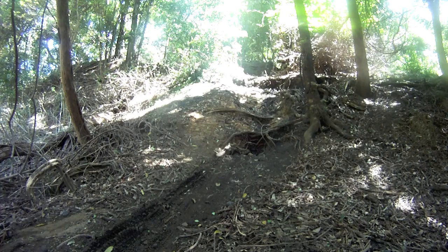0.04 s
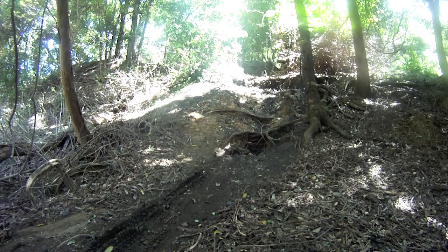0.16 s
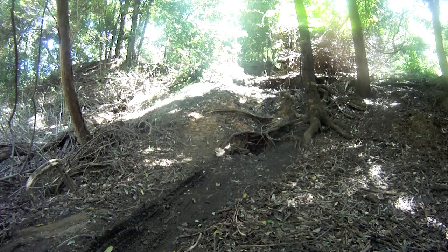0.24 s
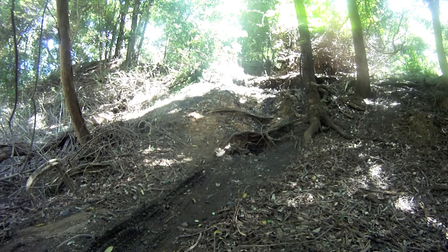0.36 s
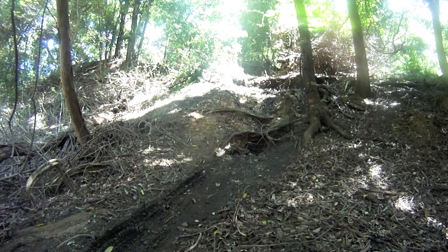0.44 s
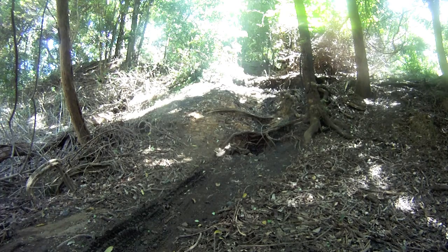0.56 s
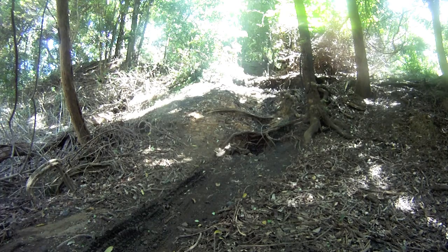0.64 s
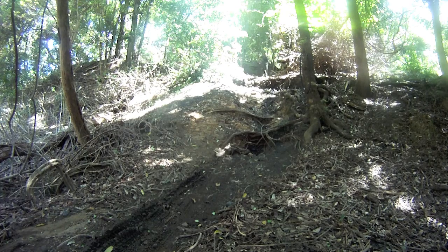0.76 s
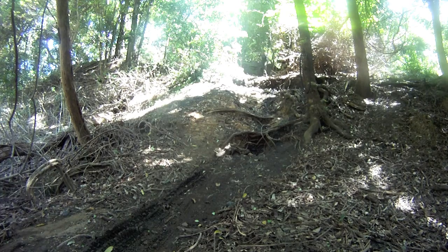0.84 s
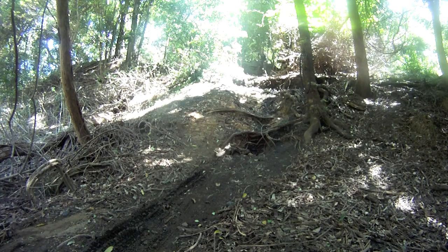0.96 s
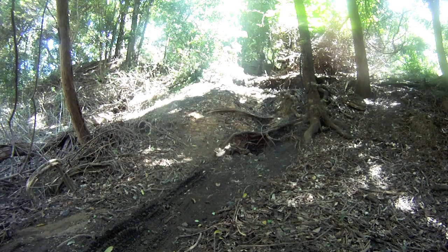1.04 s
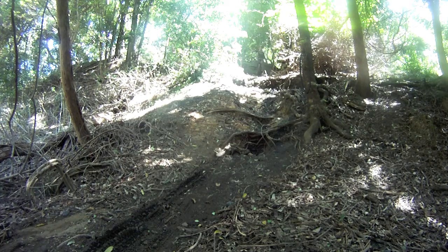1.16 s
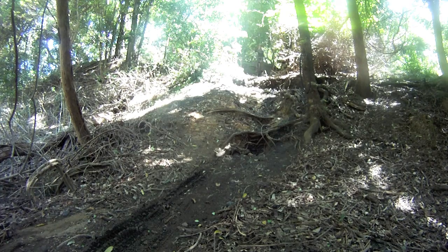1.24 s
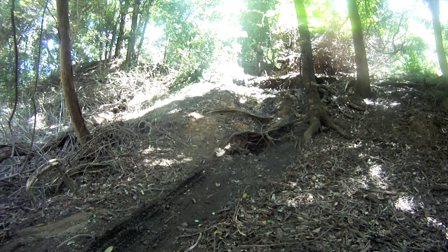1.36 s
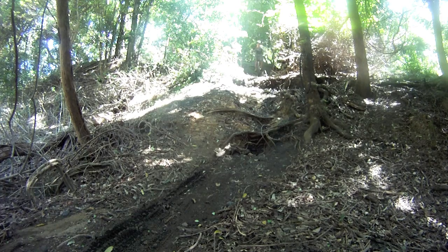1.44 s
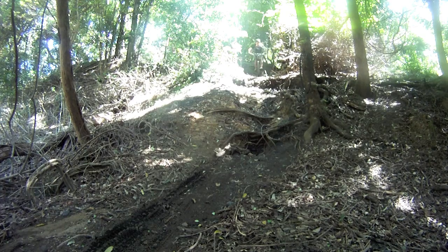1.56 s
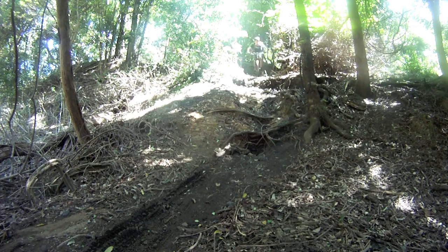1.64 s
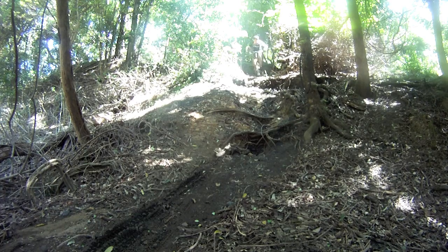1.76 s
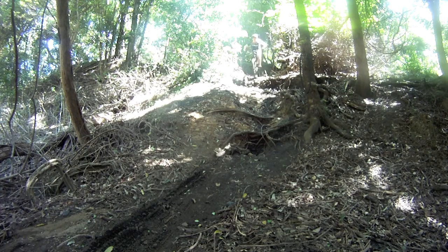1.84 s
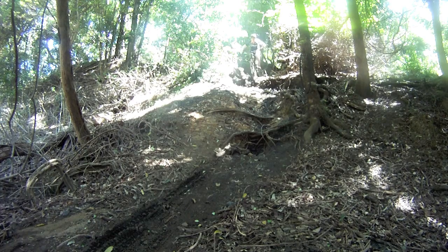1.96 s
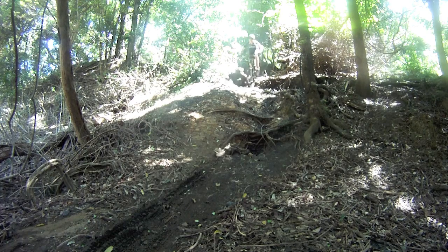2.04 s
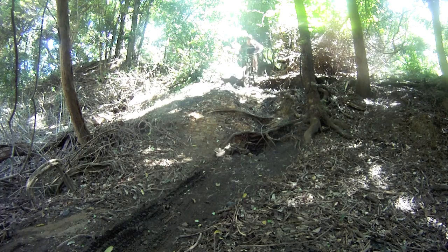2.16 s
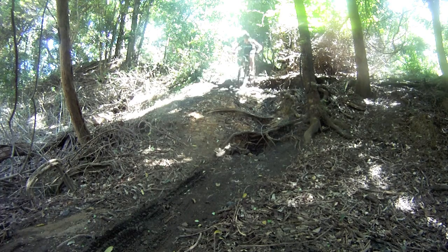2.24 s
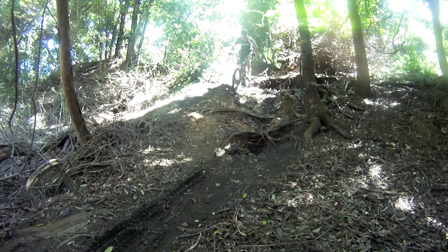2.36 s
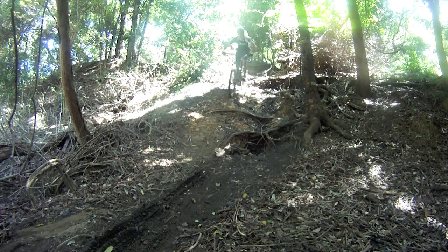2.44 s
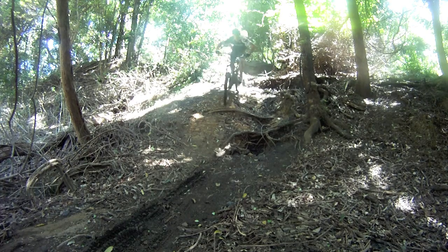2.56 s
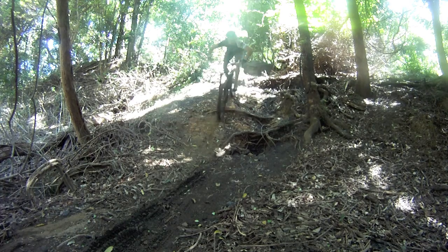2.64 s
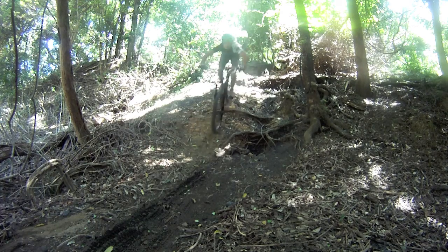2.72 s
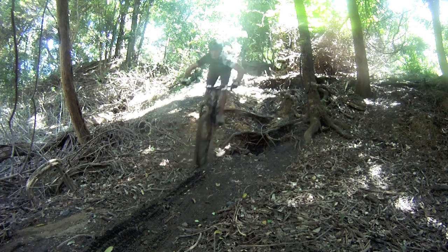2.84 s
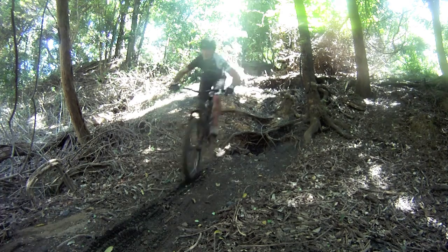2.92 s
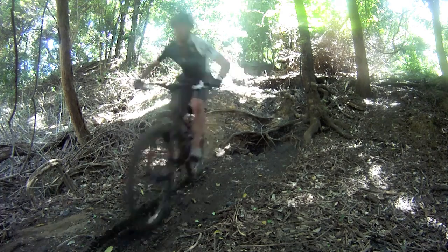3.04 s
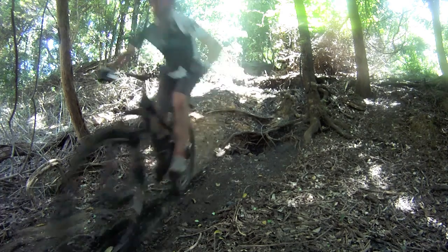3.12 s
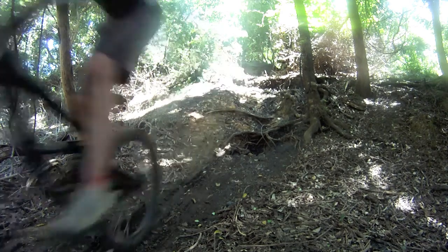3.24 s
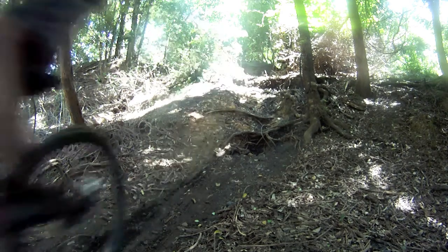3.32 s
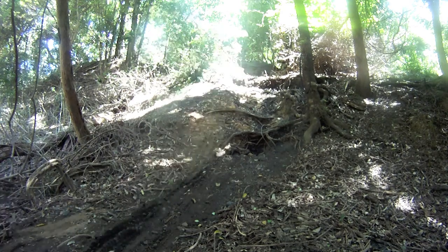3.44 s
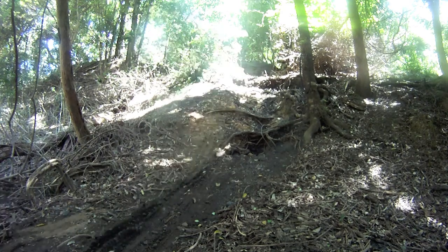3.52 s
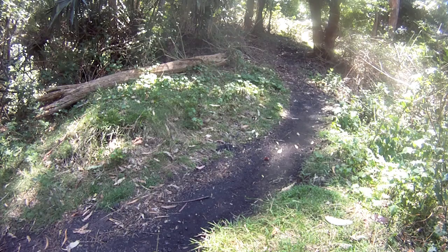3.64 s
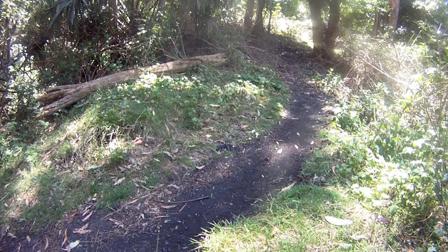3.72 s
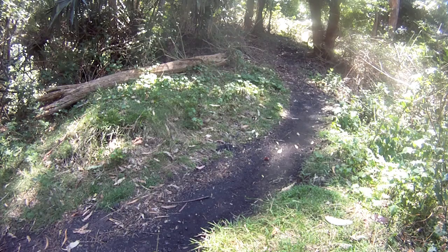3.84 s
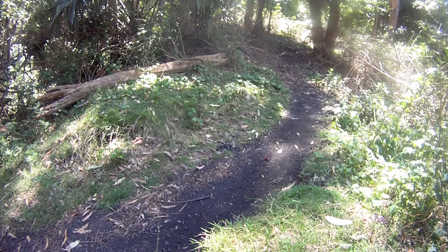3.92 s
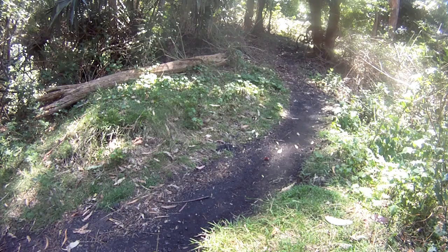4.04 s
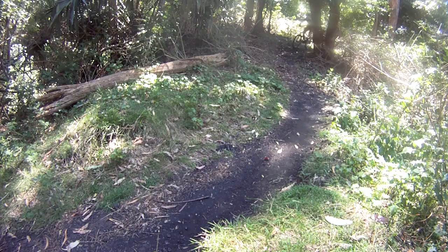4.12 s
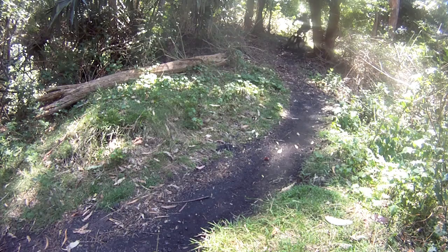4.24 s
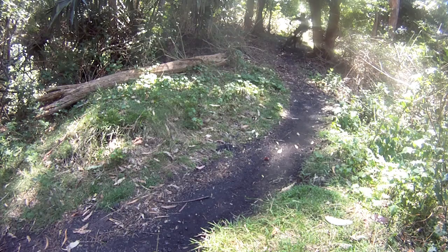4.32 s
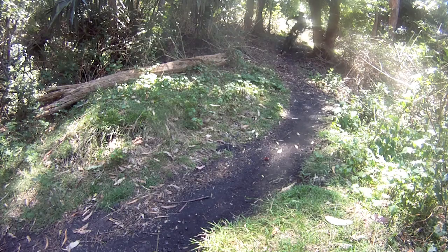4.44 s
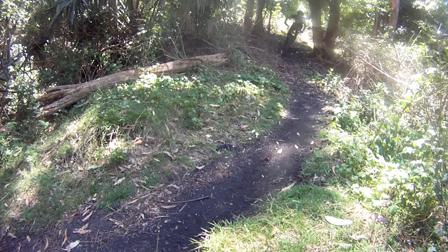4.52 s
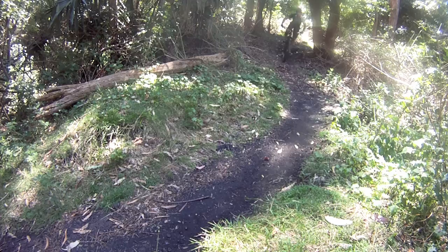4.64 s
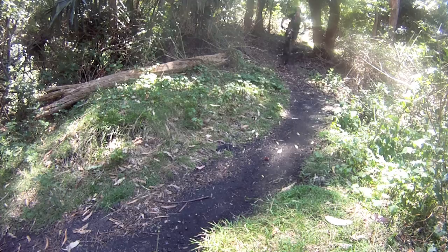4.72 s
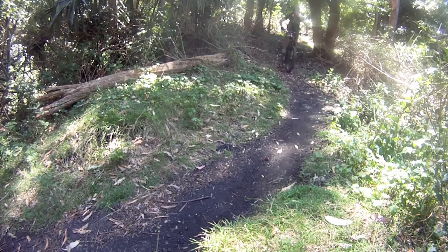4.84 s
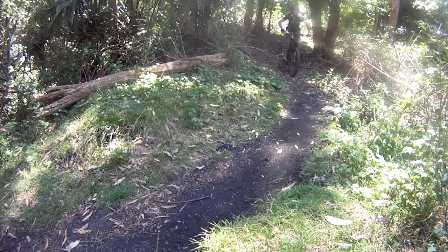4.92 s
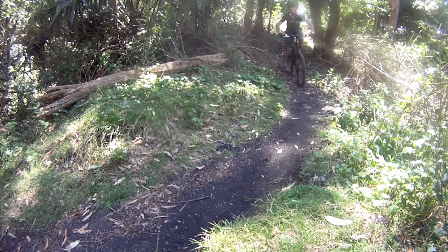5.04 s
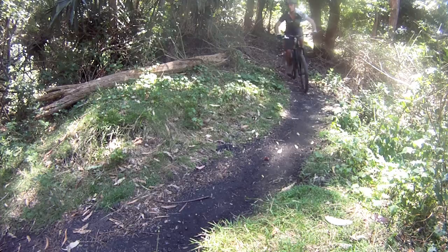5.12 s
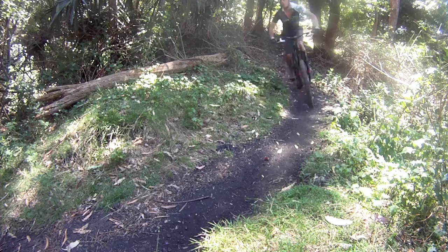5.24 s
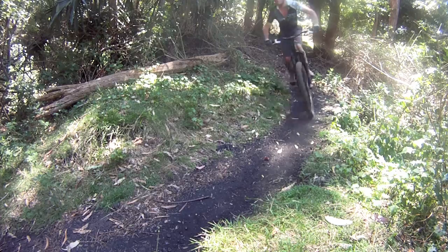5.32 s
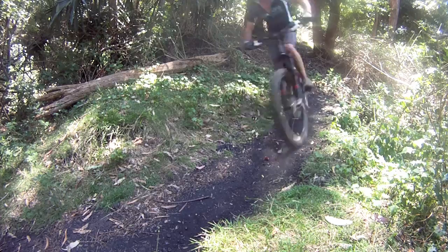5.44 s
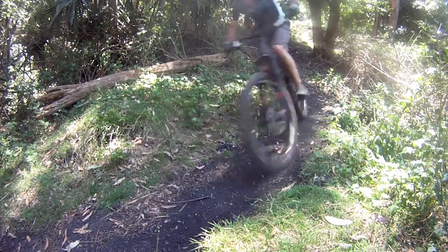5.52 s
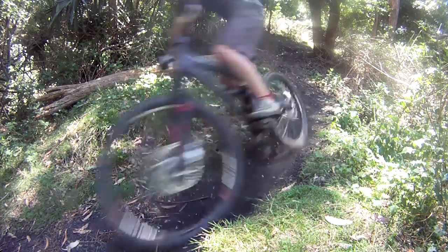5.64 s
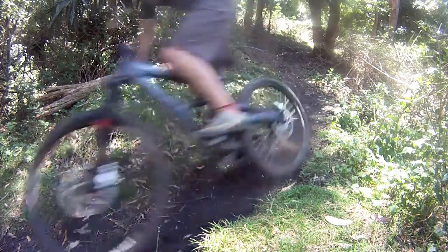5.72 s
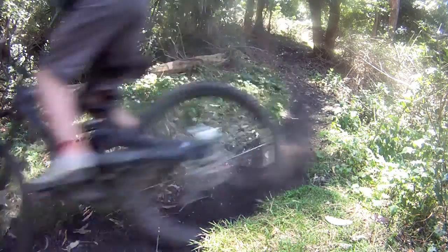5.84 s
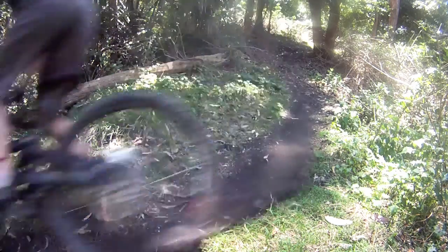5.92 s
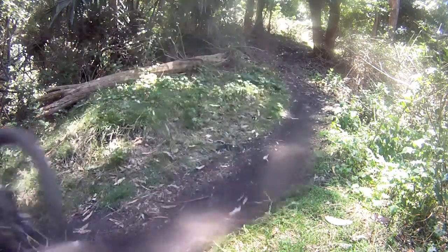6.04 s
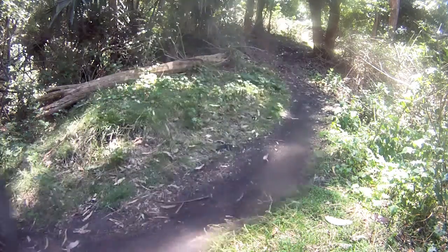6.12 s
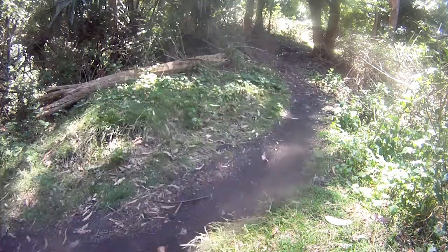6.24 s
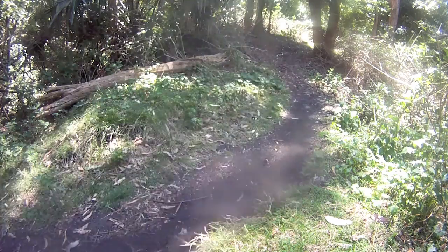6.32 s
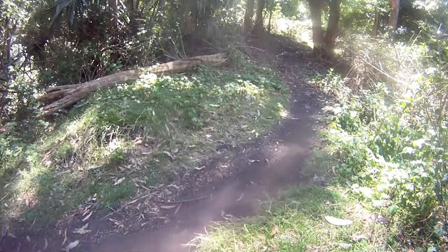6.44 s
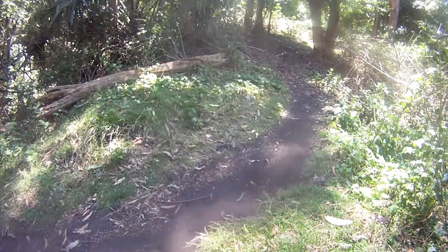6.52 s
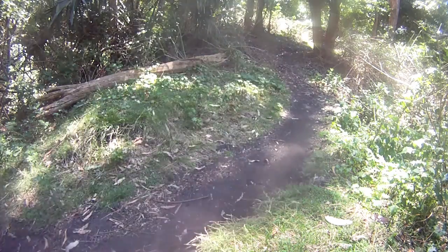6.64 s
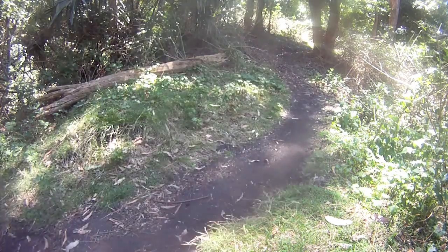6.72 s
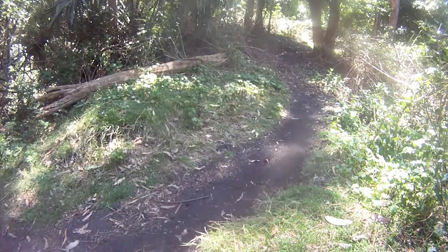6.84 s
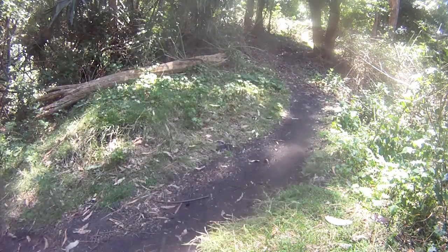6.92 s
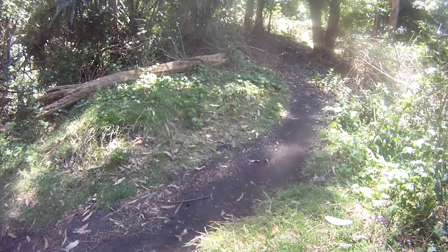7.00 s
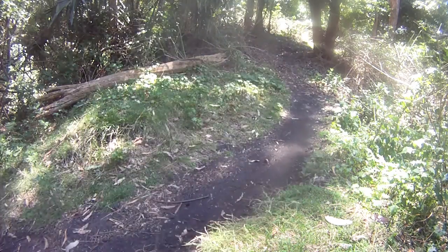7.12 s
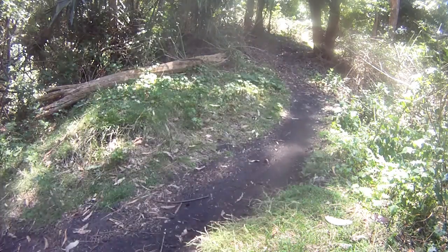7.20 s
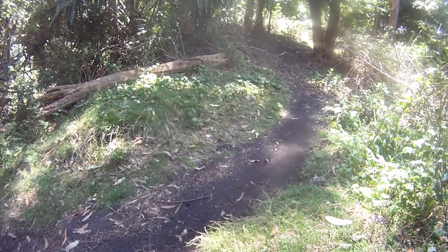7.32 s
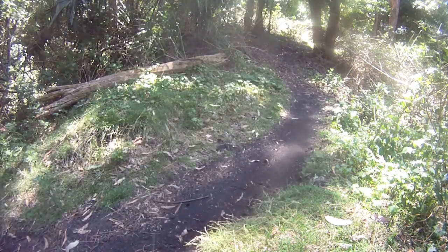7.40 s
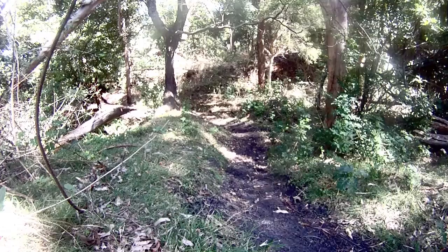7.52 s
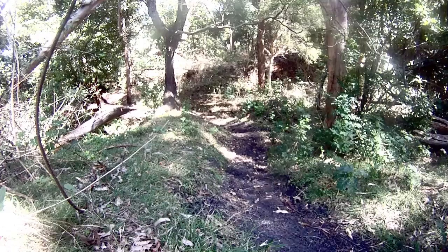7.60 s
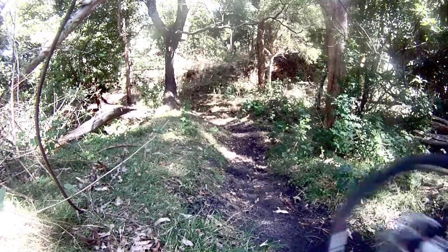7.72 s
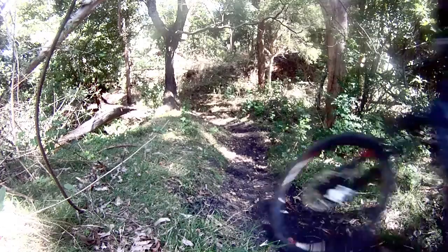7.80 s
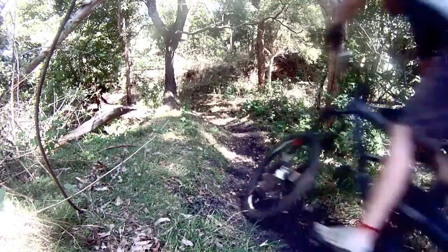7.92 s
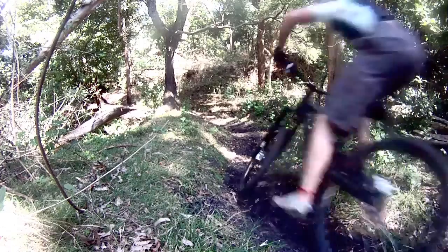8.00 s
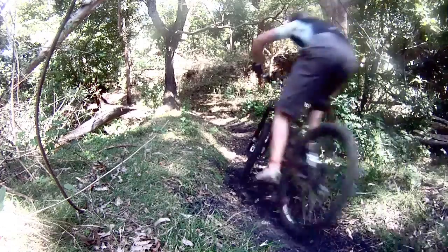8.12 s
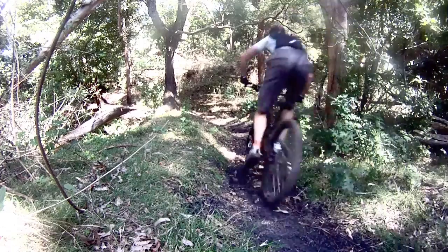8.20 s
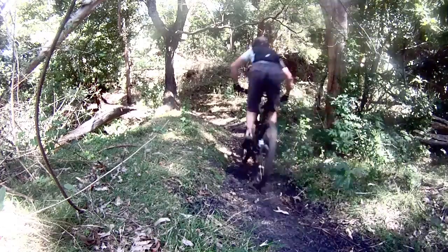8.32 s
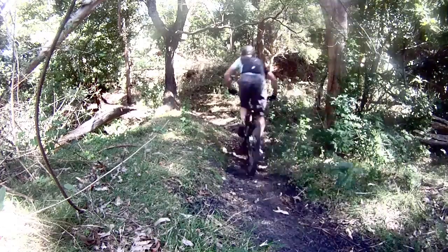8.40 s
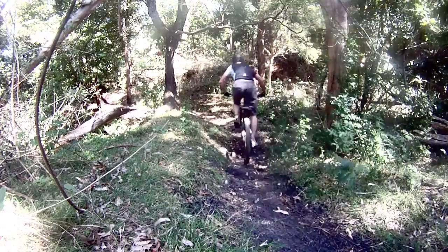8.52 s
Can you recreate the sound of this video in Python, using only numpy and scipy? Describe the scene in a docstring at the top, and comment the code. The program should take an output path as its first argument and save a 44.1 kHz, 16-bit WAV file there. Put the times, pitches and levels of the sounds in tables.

```python
"""Forest trail: a mountain bike passes a closed microphone housing three times, in slowed shots joined by fades.
Shaped noise is the forest hush; swept sine chirps are the brake, squealing in throbs.
Noise grains and bursts through resonators are tyres crunching dirt and leaves, and cracking sticks and stones.
Noise through low modes, swelling at each bump, is the ground shaking the housing.
Every 12 kHz sample is held four steps, so the sound mirrors itself in the treble."""
import sys
import numpy as np
from scipy import signal
from scipy.fft import rfft, irfft
from scipy.io import wavfile
from scipy.ndimage import uniform_filter1d

SR = 44100
rng = np.random.default_rng(int(sys.argv[2]) if len(sys.argv) > 2 else 0)


def wav_record(signal):
    """Record a signal, one row per channel, as 16-bit PCM in the file named by sys.argv[1]."""
    frames = np.transpose(np.atleast_2d(signal))
    bounded = np.clip(frames, -1, 1)
    # unit amplitude maps onto the largest positive 16-bit level
    quanta = np.round(bounded * 32767).astype(np.int16)
    wavfile.write(sys.argv[1], SR, quanta)


N = 377496  # samples


def undb(db):
    """Amplitude ratio of a level in dB."""
    return 10 ** (np.asarray(db) / 20)


def unit(x):
    """Scale to an rms of 1."""
    return x / np.sqrt(np.mean(x ** 2))


def columns(tables):
    """Joined tables as one curve per column, a value per sample."""
    time_s, *cols = np.concatenate(tables).T
    t = np.arange(N) / SR
    return [np.interp(t, time_s, col) for col in cols]


def walk(rate_hz):
    """Random levels joined by straight slews of 1 / rate_hz; spread near 0.6."""
    step = int(SR / rate_hz)
    held = np.repeat(rng.standard_normal(N // step + 1), step)
    return 0.73 * uniform_filter1d(held, step)[:N]


def shaped(x, points):
    """Colour x by (frequency [Hz], gain [dB]) points, joined over log frequency."""
    hz, db = np.transpose(points)
    f = np.maximum(np.fft.rfftfreq(N, 1 / SR), 1)
    gain_db = np.interp(np.log(f), np.log(hz), db)
    return irfft(rfft(x) * undb(gain_db), N)


def ring(x, modes):
    """Sum of resonances, neighbours in opposite phase."""
    out = 0
    for k, (hz, width_hz, db) in enumerate(modes):
        b, a = signal.iirpeak(hz, hz / width_hz, SR)
        out = out + (-1) ** k * undb(db) * signal.lfilter(b, a, x)
    return out


# hush spectrum: (frequency [Hz], relative density [dB per Hz])
HUSH_SPECTRUM = [(15, -26), (25, -3), (96, -2.5), (347, -9.5), (535, -12), (704, -12.5), (885, -16.5),
                 (1400, -18), (1640, -20), (1840, -20), (2210, -21.5), (3650, -23), (4800, -25),
                 (5900, -31.5), (7670, -66), (13000, -120)]
HUSH_DB = -62  # about which the level wavers


def forest():
    """Gently wavering hush of trees and microphone: shaped noise."""
    hush = unit(shaped(rng.standard_normal(N), HUSH_SPECTRUM))
    return undb(HUSH_DB + 2.0 * walk(5)) * hush


# three spells of braking: (time [s], strong chirp peak [dB], mid pitch [Hz])
BRAKING = [
    [(4.87, -56, 2700), (4.92, -62, 2670)],
    [(5.8, -48, 2850), (5.91, -44, 2840), (6.1, -44.5, 2800), (6.17, -45.5, 2795), (6.23, -53, 2760),
     (6.3, -58, 2660), (6.37, -56, 2580), (6.43, -62, 2560)],
    [(8.3, -60, 2840), (8.43, -62, 2800), (8.49, -53.5, 2870), (8.55, -50, 2880)],
]
FIRST_GRAB_S, GRAB_EVERY_S = (4.871, 5.78, 8.306), (.0635, .0635, .059)  # per spell
WEAK_DB, WEAK_LAG = -8, .47  # weak chirp re strong; lag as share of the gap
CHIRP_S = 0.033


def chirps():
    """(s, peak dB, pitch Hz) of every chirp: the pad grabs at an even pace, strong and weak in turn."""
    for spell, first_s, gap_s in zip(BRAKING, FIRST_GRAB_S, GRAB_EVERY_S):
        time_s, db, hz = np.transpose(spell)
        for grab_s in np.arange(first_s, time_s[-1], gap_s):
            for at_s, change_db in ((grab_s, 0), (grab_s + WEAK_LAG * gap_s, WEAK_DB)):
                if at_s * SR < N:
                    yield at_s, np.interp(at_s, time_s, db) + change_db, np.interp(at_s, time_s, hz)


def brake():
    """The pad grabs the rotor in short squeals whose pitch sags as each lets go."""
    out, waver = np.zeros(N), walk(150)
    swell = np.hanning(int(CHIRP_S * SR)) ** 0.42
    sag = np.linspace(.017, -.017, len(swell))
    for s, peak_db, hz in chirps():
        i = int(s * SR)
        n = min(len(swell), N - i)
        pitch_hz = hz * (1 + sag[:n] + 0.0072 * waver[i:i + n])
        tone = np.sin(2 * np.pi * np.cumsum(pitch_hz) / SR)
        out[i:i + n] += undb(peak_db) * swell[:n] * tone
    return out


# resonances of housing, dirt, leaves: (frequency [Hz], width [Hz], relative level [dB])
HOUSING_MODES = [(2106, 138, 4), (2260, 135, 4.5), (2459, 75, 5), (2902, 204, -4), (1854, 170, -9.5),
                 (3170, 125, -10.5)]
DIRT_MODES = [(1015, 230, 10), (1271, 107, 10), (1540, 146, 8), (788, 160, -1.5), (617, 200, 1)]
LEAF_MODES = [(3576, 300, 2.5), (4420, 1750, -3.5), (5266, 740, 0.5)]
# sticks and stones: (time [s], approx. housing peak [dB], dirt modes re peak [dB],
# leaf modes re peak [dB], burst T60 [s])
CRACKS = [(0.845, -43.5, -24, -12, 0.087), (1.3103, -34.5, -15, -2.5, 0.25),
          (1.5429, -49.5, -19, -18, 0.078), (1.6631, -52, -11, -21, 0.093), (1.771, -50, -13, -22, 0.16),
          (1.86, -49, -8, -24, 0.091), (2.05, -50, -20, -5, 0.1), (2.116, -44, -24, -8, 0.039),
          (2.276, -42, -28, -9, 0.099), (2.298, -38.5, -9.5, -7.5, 0.16), (2.4264, -47.5, -16, 3.5, 0.1),
          (2.742, -31, -11, -18, 0.052), (2.778, -37.5, -1.5, -14, 0.083), (2.9383, -47.5, -14, 7, 0.07),
          (2.982, -42.5, -4, 5.5, 0.058), (3.068, -40.5, -26, 0, 0.057), (3.115, -40.5, -10, -3.5, 0.15),
          (3.168, -39, -15, -5, 0.11), (3.185, -30, -18, -9, 0.08), (3.233, -31, -3.5, 1.5, 0.046),
          (3.284, -39, -1.5, -1, 0.064), (3.313, -29, -9.5, -8.5, 0.088), (3.341, -33.5, -15, -18, 0.065),
          (3.368, -34, -8, -27, 0.079), (3.3863, -36.5, -21, 2.5, 0.062), (3.4716, -45, -10, -16, 0.18),
          (3.565, -41.5, -8, -11, 0.041), (5.564, -32, -24, -15, 0.12), (5.6336, -42, -2, -19, 0.073),
          (5.733, -29.5, -25, -11, 0.053), (5.7793, -28.5, -18, -19, 0.056),
          (5.8276, -37.5, -3.5, -6, 0.19), (5.9244, -40, -16, -27, 0.057), (6.0247, -33, -15, -18, 0.092),
          (6.067, -42.5, -5, -20, 0.11), (6.1894, -41, -20, -12, 0.07), (6.2428, -44.5, -17, -2, 0.066),
          (6.3547, -40, -2, -26.5, 0.056), (6.71, -46, -1, -15, 0.18), (6.745, -47, -2, -15, 0.091),
          (6.8053, -44.5, 0, -18, 0.087), (7.1691, -45.5, -5, -25, 0.1), (7.2437, -47, -3.5, -6, 0.23),
          (7.5856, -33.5, -18, -34, 0.11), (7.626, -32, -20, -24, 0.079), (7.725, -34.5, -10, -26, 0.12),
          (7.749, -35, -15, -18, 0.16), (7.7872, -41, -4, -27, 0.16), (7.832, -31, -18, -8.5, 0.066),
          (7.8593, -27.5, -19, -9, 0.057), (7.932, -41, -22, -11, 0.1), (8.0656, -41, -7, -13, 0.13),
          (8.08, -48, -5, -18, 0.073), (8.132, -43, -20, -7, 0.068)]
RISE_S = 0.002
ECHO_DB, ECHO_T60_S = -30, 0.5
CREST_DB = 9  # noise peaks over rms


def cracks():
    """Each crack is a sudden burst that rings the same resonances as the tyres."""
    push, t = np.zeros((3, N)), np.arange(SR // 2) / SR
    echo = undb(ECHO_DB) * np.exp(-np.log(1000) * t / ECHO_T60_S)  # trunks scatter it back
    for s, peak_db, dirt_db, leaf_db, t60_s in CRACKS:
        i = int((s - RISE_S) * SR)
        n = min(len(t), N - i)
        shape = np.exp(-np.log(1000) * t / max(t60_s, .01)) + echo
        shape = shape * np.minimum(t / RISE_S, 1)
        family_db = peak_db + np.array([[0], [dirt_db], [leaf_db]])
        push[:, i:i + n] += undb(family_db) * shape[:n]
    noise = rng.standard_normal(N)
    out = 0
    for p, modes in zip(push, (HOUSING_MODES, DIRT_MODES, LEAF_MODES)):
        out = out + ring(p * noise, modes) / ring(noise, modes).std()
    return undb(-CREST_DB) * out


BIGGEST_GRAIN_DB = 15  # over the smallest


def grains(per_s, scatter_db, tail_s):
    """Random snaps of widely spread size, each a burst of noise whose power decays over tail_s."""
    size_db = np.minimum(scatter_db * rng.exponential(size=N), BIGGEST_GRAIN_DB)
    hit = (rng.random(N) < per_s / SR) * undb(size_db)
    power = signal.lfilter([1], [1, -np.exp(-1 / (tail_s * SR))], hit ** 2)
    return np.sqrt(power) * rng.standard_normal(N)


# tyres, per shot: (time [s], crunch level before a 0.5 dB lift [dB], dirt re housing [dB], leaf re housing [dB])
ROLL = [
    [(0, -79, 0, -1), (.25, -80.5, -5, -5), (.3, -66, -21, -5.5), (.55, -83.5, -6, -8), (1.28, -74, -5, -7),
     (1.38, -60.5, -24, -1), (1.52, -68, -17, -7.5), (2.24, -66.5, -10, -4), (2.33, -57, -15, -5.5),
     (2.45, -69, -14, -2), (2.64, -71, -7, -2), (2.82, -56, -9.5, -3.5), (3.15, -55.5, -7.5, -6.5),
     (3.33, -50.5, -9.5, -9.5), (3.46, -56.5, -8.5, -5), (3.62, -64, -12, -13)],
    [(3.7, -75, 1, -12), (4.06, -68, -5, -6.5), (4.4, -63.5, -7.5, -8), (4.6, -70.5, -4, -6),
     (4.85, -66, -11, -7.5), (5.48, -62, -7, -7), (5.57, -46, -6, -10), (5.7, -48, 1, -10.5),
     (5.78, -47.5, -8.5, -8), (5.945, -46.5, 0.5, -16.5), (5.975, -59, -7, -3.5), (6.33, -59.5, -9, -7.5),
     (6.62, -68, -8, -8.5), (6.73, -58.5, 1, -13), (6.86, -64.5, -5, -7), (7.45, -67, -2, -7)],
    [(7.53, -50, -5.5, -13.5), (7.6, -48, -7.5, -16), (7.71, -55, -4, -14), (7.74, -46.5, -7.5, -13),
     (7.93, -53.5, -10, -12), (8.04, -62, -7.5, -11), (8.35, -64.5, -7, 0), (8.56, -63.5, -7, -12)],
]
COLOUR_SHIFT_DB = 2.5  # per unit of walk()


def tyres():
    """Dense grains crushed under the knobs in uneven patches; dirt and leaves break partly on their own."""
    crunch_db, dirt_db, leaf_db = columns(ROLL)
    shared = grains(per_s=500, scatter_db=3.0, tail_s=0.009)
    patches = undb(1.06 * walk(18))
    out = 0
    for db, modes in zip((0, dirt_db, leaf_db), (HOUSING_MODES, DIRT_MODES, LEAF_MODES)):
        crush = 0.86 * shared + grains(per_s=550, scatter_db=3.0, tail_s=0.0033)
        family = 0
        for k, mode in enumerate(modes):
            feed = undb(COLOUR_SHIFT_DB * walk(15))  # uneven as the ground changes
            family = family + (-1) ** k * feed * ring(crush * patches, [mode])
        out = out + undb(db) * unit(family)
    return undb(crunch_db + 0.5) * out


# shake as the bike nears and leaves, per shot: (time [s], low rms [dB], upper rms [dB], thud rms [dB])
SHAKE = [
    [(0, -75, -73, -77), (1.9, -68, -74.5, -73.5), (2.05, -61.5, -71, -72), (2.65, -67, -65, -73),
     (2.82, -47, -50.5, -63), (3.1, -46, -43.5, -59.5), (3.4, -52, -47.5, -50), (3.47, -49, -59, -58),
     (3.62, -56, -53.5, -64.5)],
    [(3.7, -68, -67, -75), (4.2, -63, -69.5, -70), (4.95, -63, -69, -69.5), (5.12, -51, -52.5, -72),
     (5.36, -56, -56.5, -71), (5.55, -37, -41.5, -59), (5.9, -42, -37.5, -38.5), (6.05, -44.5, -47.5, -58),
     (6.5, -49, -48.5, -71), (6.62, -59, -54, -69), (7.1, -57.5, -60, -68), (7.45, -58, -64, -71)],
    [(7.53, -51, -53, -63), (7.58, -38.5, -38.5, -56), (7.95, -42, -43.5, -54), (8.15, -48, -51.5, -67),
     (8.33, -52, -49, -65), (8.56, -46.5, -51, -63)],
]
SHAKE_WAVER_DB = 2.5  # per unit of walk()
# wheels over roots and ruts: (swell peak time [s], low rms [dB], upper rms [dB], thud rms [dB])
BUMPS = [(2.14, -57, -70, -72), (2.36, -56, -61.5, -70), (2.5, -53.5, -70, -72), (2.89, -39, -41.5, -62),
         (3.02, -52, -60, -67), (3.14, -39.5, -38.5, -51), (3.209, -45, -43, -41.5), (3.33, -40, -37, -51),
         (3.398, -48, -36.5, -43), (3.59, -52, -57, -62), (5.19, -44.5, -55, -74), (5.26, -44.5, -52, -72),
         (5.44, -44, -45, -69), (5.63, -29.5, -42, -45), (5.71, -42, -36, -45.5), (5.82, -38, -29, -42),
         (5.89, -47, -33, -34), (5.99, -38, -40, -49), (6.1, -44, -40, -51), (6.2, -43, -50, -60),
         (6.32, -44, -52, -66), (6.87, -54, -56, -73), (7.2, -53, -58, -67), (7.34, -55, -62, -69),
         (7.63, -40.5, -45, -57), (7.73, -40, -38.5, -54), (7.84, -33.5, -50, -51), (7.92, -44, -36, -54),
         (8.01, -38.5, -46, -62), (8.1, -39.5, -59, -57), (8.42, -56, -50, -66)]
BUMP_RISE_S, BUMP_FALL_S = (.03, 0.024, 0.017), (0.036, 0.018, 0.014)  # low, upper, thud: low swells slowest


def shaking():
    """Rms of each family of ground modes: the wavering shake plus a swell for every bump, summed as power."""
    power = np.array([undb(db + SHAKE_WAVER_DB * walk(14)) ** 2 for db in columns(SHAKE)])
    t = np.arange(N) / SR
    for s, *dbs in BUMPS:
        near = slice(int((s - .2) * SR), int((s + .2) * SR))
        lag = t[near] - s
        for p, db, rise_s, fall_s in zip(power, dbs, BUMP_RISE_S, BUMP_FALL_S):
            p[near] += undb(db) ** 2 * np.exp(-(lag / np.where(lag < 0, rise_s, fall_s)) ** 2)
    return np.sqrt(power)


# ground modes, per pass of two: (frequency [Hz], width [Hz], relative level [dB])
LOW_MODES = [(44.9, 19.7, -2.5), (33.2, 12.3, -9.5)]
UPPER_MODES = [(83.55, 11.3, 1), (113.8, 25, -4)]
THUD_MODES = [(156.6, 33.2, 0.5), (235.8, 40.6, -2), (299, 30.5, -3.5)]


def ground():
    """Soil and mount ring in low modes as the wheels bump along; the swing is steadier than noise."""
    out = 0
    for rms, modes in zip(shaking(), (LOW_MODES, UPPER_MODES, THUD_MODES)):
        swing = unit(ring(ring(rng.standard_normal(N), modes), modes))
        envelope = np.abs(signal.hilbert(swing))
        steadied = swing / (0.034 + envelope) ** 0.81
        out = out + rms * unit(steadied)
    return out


# fades between shots: (quietest time [s], fade-out slope [s], fade-in slope [s])
FADES = [(3.656, 0.067, 0.075), (7.493, 0.096, 0.039)]


def scene():
    """Sum of all sources, dipping to 2 % amplitude between shots."""
    mono = forest() + brake() + cracks() + tyres() + ground()
    t = np.arange(N) / SR
    for s, out_s, in_s in FADES:
        mono = mono * np.clip(np.maximum((s - t) / out_s, (t - s) / in_s), .02, 1)
    return np.array([mono, mono])


# side hiss spectrum: (frequency [Hz], relative density [dB per Hz])
SIDE_SPECTRUM = [(88, -22), (150, -10.5), (396, 4.5), (3550, -2), (5080, 0), (5970, -34), (6650, -3.5),
                 (8400, -10), (11000, -37), (14300, -57), (22000, -120)]
SIDE_DB = -82.5  # rms before the low-pass
TOP_HZ = 15250


def record(dry):
    """Quarter-speed hold: each 12 kHz sample lasts four 48 kHz steps; hiss of opposite sign left and right."""
    slow = signal.resample_poly(dry[0], 40, 147)  # to 12 kHz
    held = signal.resample_poly(np.repeat(slow, 4), 147, 160)[:N]  # 48 to 44.1 kHz
    mid = np.pad(held, (0, N - len(held)))
    side = undb(SIDE_DB) * unit(shaped(rng.standard_normal(N), SIDE_SPECTRUM))
    low_pass = signal.ellip(10, .2, 80, TOP_HZ, fs=SR, output="sos")
    return signal.sosfilt(low_pass, [mid + side, mid - side])


dry = scene()
out = record(dry)
wav_record(out)
```